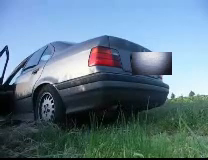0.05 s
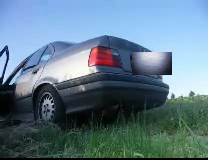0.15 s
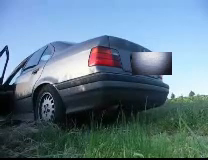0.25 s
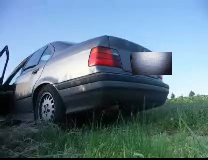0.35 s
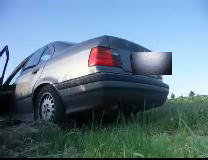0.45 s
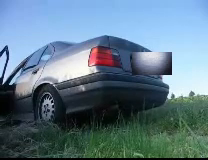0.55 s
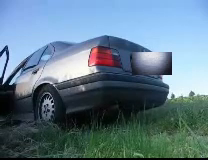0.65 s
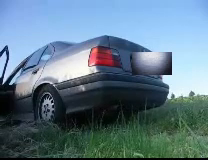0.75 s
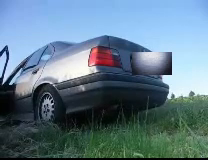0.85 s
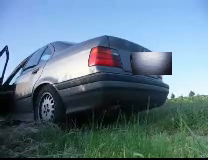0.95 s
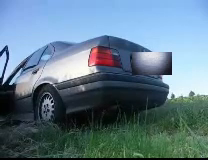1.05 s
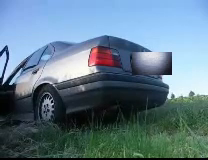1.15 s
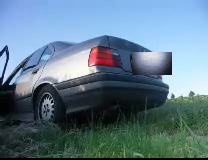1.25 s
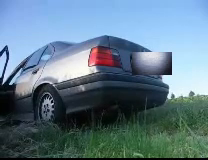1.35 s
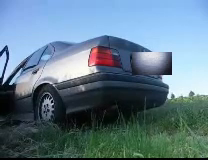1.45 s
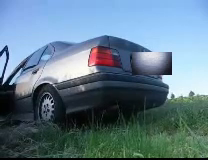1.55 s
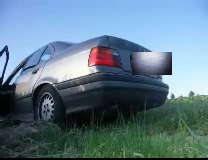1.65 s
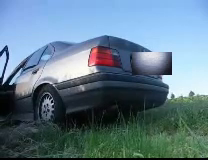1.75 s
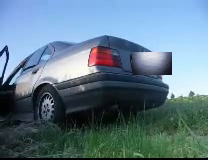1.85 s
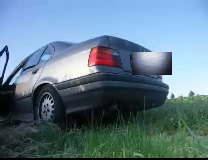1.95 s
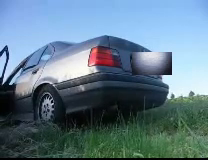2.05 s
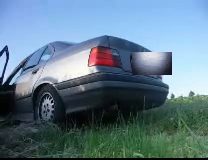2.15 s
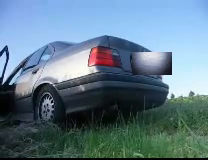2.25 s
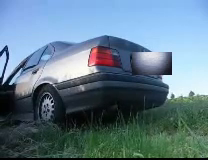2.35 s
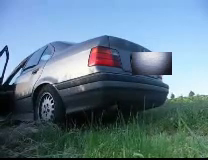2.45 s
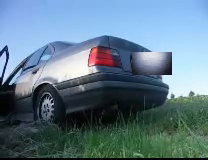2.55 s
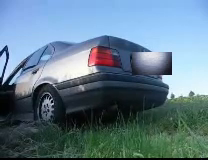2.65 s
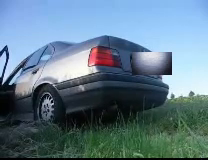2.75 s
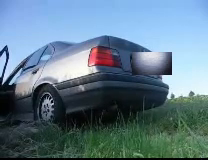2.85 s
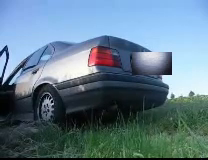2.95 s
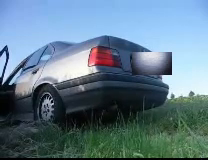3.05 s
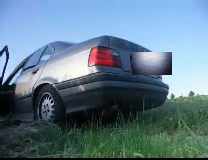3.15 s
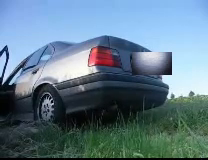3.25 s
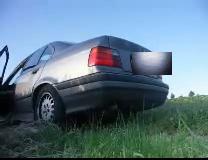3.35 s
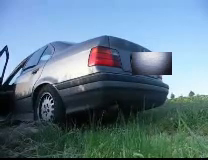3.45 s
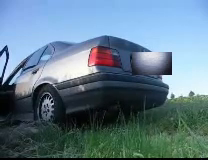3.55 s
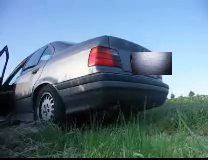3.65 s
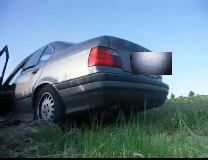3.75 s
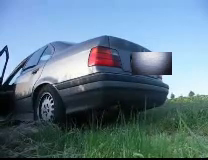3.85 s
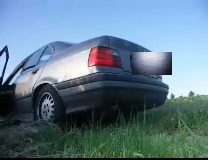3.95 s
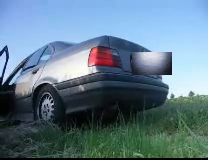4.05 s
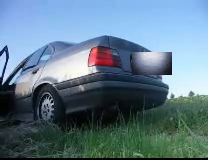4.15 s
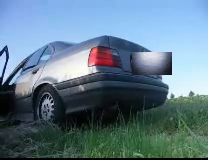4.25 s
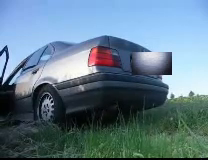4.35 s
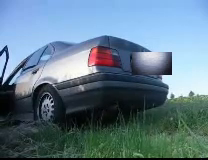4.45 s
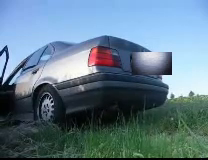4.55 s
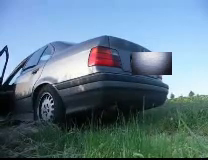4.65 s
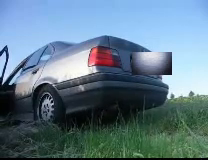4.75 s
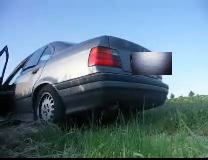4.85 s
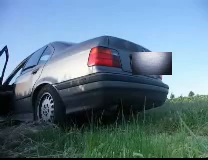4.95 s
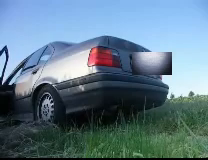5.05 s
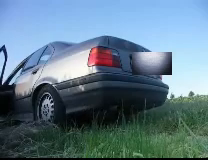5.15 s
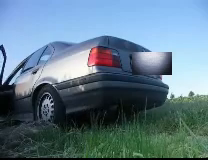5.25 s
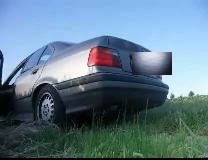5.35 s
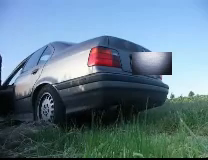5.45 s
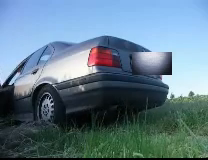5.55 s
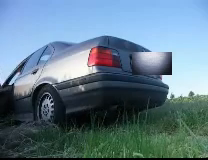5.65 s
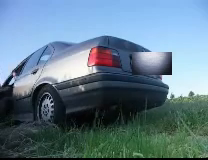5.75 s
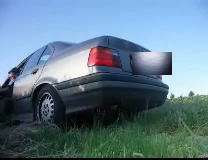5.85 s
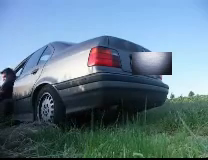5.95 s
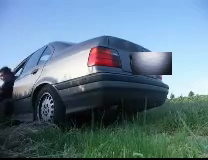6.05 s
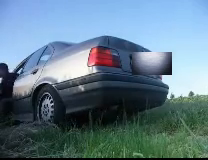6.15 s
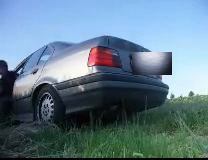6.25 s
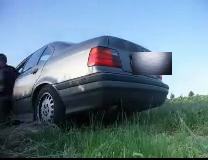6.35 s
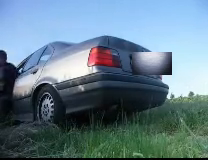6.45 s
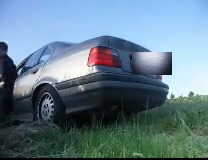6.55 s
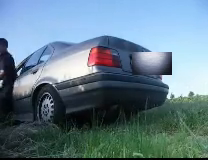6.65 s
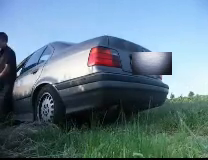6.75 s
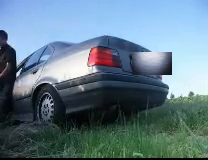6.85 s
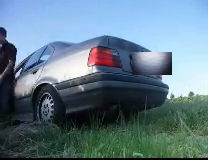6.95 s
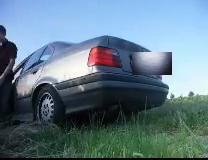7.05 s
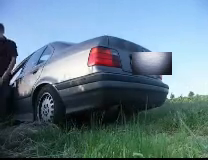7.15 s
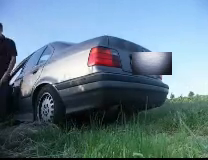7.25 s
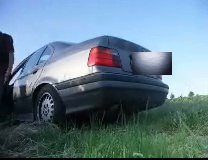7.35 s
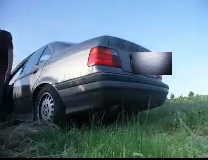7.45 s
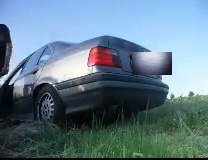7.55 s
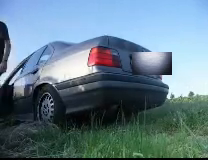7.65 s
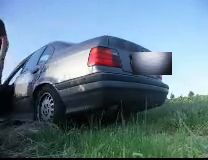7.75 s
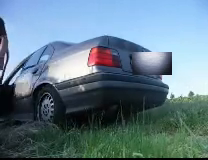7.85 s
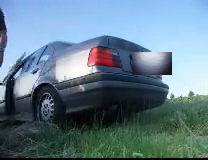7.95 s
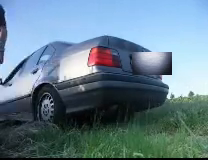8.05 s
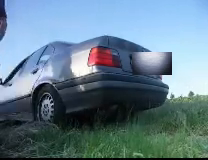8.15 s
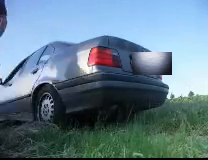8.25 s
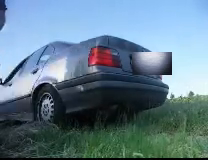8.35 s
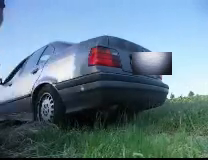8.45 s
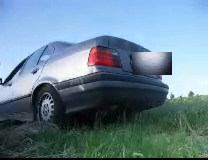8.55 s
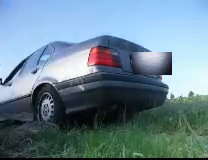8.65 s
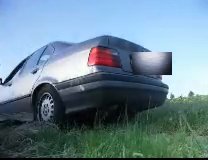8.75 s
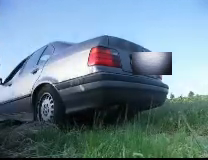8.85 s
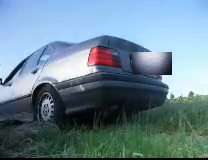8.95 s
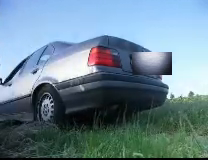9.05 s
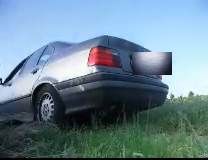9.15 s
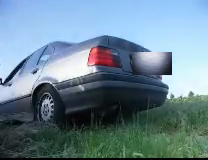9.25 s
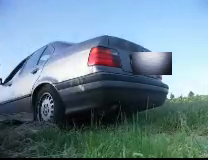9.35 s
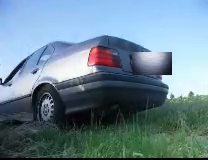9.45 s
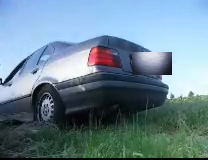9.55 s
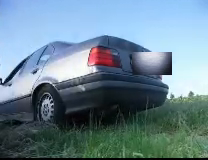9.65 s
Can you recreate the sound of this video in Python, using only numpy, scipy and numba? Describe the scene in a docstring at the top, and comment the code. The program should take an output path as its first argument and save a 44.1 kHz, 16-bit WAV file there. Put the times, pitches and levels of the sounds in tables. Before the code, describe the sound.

Outdoors, a small camera with muffled treble sits near a car's tailpipe. The engine is already revving, drops, gets two quick stabs, sags, then roars highest and crackles down to idle. Loose metal buzzes and rattles, the body knocks, and another engine hums and clatters steadily. Soft exhaust thumps follow, then a heavy door slam, quieter idling and dry grass crunching underfoot.

```python
"""A six-cylinder car roars as its throttle is stabbed, burbles and pops as the revs fall, then drops to idle.
Its firings ring the exhaust and a loose part buzzes and rattles; from the start a second engine whirrs nearby.
Knocks and bangs are short bursts through resonances. Late on, a door slams and steps crackle in the grass.
A small camera turns loud peaks down, lets the level creep back, and cuts the treble."""
import sys
import numpy as np
from scipy import signal
from scipy.fft import rfft, irfft, next_fast_len
from scipy.io import wavfile
from scipy.ndimage import uniform_filter1d
from numba import njit

SR = 44100
rng = np.random.default_rng(int(sys.argv[2]) if len(sys.argv) > 2 else 0)


def bounce(signal):
    """Save signal as a 16-bit WAV file at the path given by the first command-line argument."""
    frames = np.transpose(np.atleast_2d(signal))
    limited = np.clip(frames, -1, 1)
    pcm = np.round(limited * 32767).astype(np.int16)
    wavfile.write(sys.argv[1], SR, pcm)


N = 427769
T = np.arange(N) / SR  # time of every sample [s]


def undb(db):
    """Turn decibels into a gain."""
    return 10 ** (np.asarray(db) / 20)


def curves(rows):
    """Join each column of a table by straight lines in time."""
    s, *columns = np.transpose(rows)
    return [np.interp(T, s, column) for column in columns]


def cut(x, hz, kind, order=2):
    """Remove the lows, the highs or both with a Butterworth filter."""
    return signal.sosfilt(signal.butter(order, hz, kind, fs=SR, output="sos"), x + 1e-18)


def ring(x, modes):
    """Drive several resonances (frequency [Hz], width [Hz], level [dB]) with the same sound."""
    out = 0
    for hz, width, db in modes:
        b, a = signal.iirpeak(hz, hz / width, fs=SR)
        out = out + undb(db) * signal.lfilter(b, a, x + 1e-18)
    return out


def colour(x, points):
    """Shape the spectrum to pass through points (frequency [Hz], level [dB])."""
    hz, db = np.transpose(points)
    size = next_fast_len(len(x))
    f = np.fft.rfftfreq(size, 1 / SR)
    gain = undb(np.interp(np.log(f + 1), np.log(hz), db))
    return irfft(rfft(x, size) * gain, size)[:len(x)]


def steady(x, size=4000):
    """Even out the loudness over a moving stretch of samples, keeping the single beats."""
    power = uniform_filter1d(uniform_filter1d(x ** 2, size), size)
    return x / np.sqrt(np.abs(power) + 1e-14)


def add(out, s, x):
    """Mix a short sound in at a time in seconds."""
    i = int(s * SR)
    out[i:i + len(x)] += x[:max(N - i, 0)]


def gate(s, length, rise, fall):
    """Rise from 0 to 1, hold, and fall back; all times in seconds."""
    end = s + max(length, rise)
    return np.interp(T, [s, s + rise, end, end + fall], [0, 1, 1, 0])


def wander(hz):
    """Drift slowly at random around 0, with a spread near 1."""
    knots = np.arange(0, T[-1] + 1, .5 / hz)
    return 1.2 * np.interp(T, knots, rng.standard_normal(len(knots)))


def strikes(turn, angles, sizes):
    """Place an impulse each time the engine passes one of the angles (counted in firings)."""
    return np.bincount(np.searchsorted(turn, angles), sizes, N + 1)[:N]


def crackle(events, modes, grain_db):
    """Ring resonances with short swells (middle [s], peak [dB], length [s], brightness [Hz]) of tiny contacts."""
    out = np.zeros(N)
    for s, db, length, bright_hz in events:
        count = int(length * SR)
        grains = rng.standard_normal(count) * undb(grain_db * rng.exponential(size=count))
        swell = np.pad(grains * np.hanning(count), (0, 1500))  # room to ring on
        burst = cut(ring(swell, modes), bright_hz, "low")
        add(out, s - length / 2, undb(db) * burst / np.abs(burst).max())
    return out


# engine speed, with quick climbs and slow run-downs: (time [s], speed [firings per second])
ENGINE_SPEED = [(0, 67), (.17, 85), (.48, 69.8), (.7, 66.5), (.82, 60.2), (1.22, 49), (1.36, 60.7),
                (1.53, 69.2), (1.85, 59.7), (2.1, 65), (2.36, 58.6), (2.67, 62.6), (3.06, 57.4),
                (3.49, 47.7), (3.66, 50), (3.8, 78), (3.91, 109), (4.0, 123), (4.43, 109.5), (4.76, 99.2),
                (4.93, 92.4), (5.17, 79.5), (5.6, 53.5), (5.85, 39.4), (9.7, 38.9)]
IDLE_HZ = 38  # idling speed [firings per second]


def engine_motion():
    """Add up the speed into firings passed, and give the revs in octaves (doublings) above idle."""
    speed, = curves(ENGINE_SPEED)
    return .5 + np.cumsum(speed) / SR, np.log2(speed / IDLE_HZ)


# unevenness of the firings off the throttle: (time [s], unevenness [0-1])
BURBLE = [(.35, 0.4), (.65, 0.6), (3.05, 0.7), (3.4, 0.4), (4.25, 0.5), (4.6, 0.8), (4.9, 0.8), (5.15, 0.7),
          (5.6, 0.4), (6.3, 0.2), (8.3, 0.3), (9.3, 0.7)]
# surges of afterburn off the throttle: (time [s], length [s], gain [dB])
SURGES = [(0.31, 0.32, 3.5), (1.578, 0.13, 4.5), (1.943, 0.18, 5), (2.267, 0.49, 1.5), (4.464, 0.39, 4.5),
          (5.014, 0.53, 6)]
SURGE_RISE_S, SURGE_FALL_S = 0.059, 0.2
# stabs of the throttle, with the exhaust level at twice idle speed:
# (time [s], held for [s], exhaust level [dB], lull after it [s], change of level in the lull [dB])
THROTTLE_STABS = [(-.02, .165, -13.5, .15, -3), (1.218, .19, -12, .03, -2.5), (1.436, .114, -13, .1, -2.5),
                  (3.651, .37, -13.5, .29, -4)]
OPEN_S, CLOSE_S = 0.046, 0.015  # time the throttle takes to open and close
# throttle shut: level at idle and rise at twice that speed; the pipe's rise flattens, bark is relative to it
PIPE_DB, PIPE_RISE_DB, PIPE_BEND = -27.5, 11, 0.64
BARK_DB, BARK_RISE_DB = -17.5, 4
SHUT_DB = -2.5  # the idle sounds fainter once the door is shut
# throttle open: bark [dB] and unevenness [0-1] at twice idle speed
OPEN_BARK_DB, OPEN_BURBLE = -6.5, .1
# throttle open: changes per doubling of speed; unevenness only grows above twice idle speed
OPEN_RISE_DB, OPEN_BARK_RISE_DB, OPEN_BURBLE_RISE = 5.5, -6, .45


def effort(revs):
    """Let level, bark and unevenness follow the revs, and turn loud, hard and more even on the throttle."""
    pipe_db = PIPE_DB + PIPE_RISE_DB * np.maximum(revs, 0) ** PIPE_BEND
    pipe_db = pipe_db + SHUT_DB * (T > DOOR_BLOWS[0][0])
    bark_db = BARK_DB + BARK_RISE_DB * revs
    burble, = curves(BURBLE)
    for s, length, db in SURGES:
        pipe_db = pipe_db + db * gate(s, length, SURGE_RISE_S, SURGE_FALL_S)
    for s, held, db, lull, lull_db in THROTTLE_STABS:
        throttle = gate(s, held, OPEN_S, CLOSE_S)
        open_pipe_db = db + OPEN_RISE_DB * (revs - 1)
        open_bark_db = OPEN_BARK_DB + OPEN_BARK_RISE_DB * (revs - 1)
        open_burble = OPEN_BURBLE + OPEN_BURBLE_RISE * np.maximum(revs - 1, 0)
        # slide from the shut-throttle values to the open ones
        pipe_db = pipe_db + throttle * (open_pipe_db - pipe_db)
        pipe_db = pipe_db + lull_db * gate(s + held, lull, CLOSE_S, CLOSE_S)
        bark_db = bark_db + throttle * (open_bark_db - bark_db)
        burble = burble + throttle * (open_burble - burble)
    return pipe_db, bark_db, burble


# resonances that the clean harmonics slide through: (frequency [Hz], width [Hz], level [dB])
GROWL_MODES = [(203.4, 31, 8), (293, 49, -1), (418, 43, -11), (589, 20, -6.5)]
GROWL_TOP_HZ = 580


def growl(turn, odd_db, count=9):
    """Slide clean harmonics of the firing rate through the silencer's resonances; the highest fade away."""
    wave = 0
    for k in range(2, count + 1):
        level = undb(odd_db) if k % 2 else 1
        wave = wave - np.cos(2 * np.pi * k * turn) * level * (1 + .45 * wander(16))
    return steady(cut(ring(wave, GROWL_MODES), GROWL_TOP_HZ, "low", order=6), size=2500)


# strength of each cylinder in firing order [dB] when wholly uneven; under load they even out
CYLINDERS = [4, -6, 5, -4.5, 6, -11.5]
# exhaust resonances: (frequency [Hz], width [Hz], level [dB])
PIPE_MODES = [(132, 64, 1.5), (201, 20, 9.5), (264.7, 43, 3.5), (392, 47, -14), (456.6, 43, 1),
              (575, 45, -6.5), (750, 58, -8), (780, 140, -31.5)]
# firmness of the note: (time [s], share of power in clean harmonics [0-1], level of the odd ones [dB])
FIRMNESS = [(0, .02, 0), (.14, .02, 0), (.2, .5, -6), (.42, .55, -6), (.55, .55, 0), (.8, .25, 0),
            (1.18, .4, 0), (1.24, .02, 0), (1.55, .02, 0), (1.7, .5, 0), (2.2, .45, 0), (2.8, .3, 0),
            (3.5, .6, 0), (3.66, .02, 0), (3.82, .02, 0), (3.9, .7, -7), (4.02, .75, -6), (4.08, .25, -3),
            (4.3, .2, -3), (4.5, .75, -3), (4.8, .75, -4), (4.95, .45, -5), (5.08, .7, -10), (5.3, .7, -8),
            (5.42, .8, 2), (5.55, .7, 2), (5.7, .2, 0)]
# the exhaust's upper resonances against its lowest: (time [s], level [dB])
UPPER_LEVEL = [(0, -6), (.35, 0.5), (.55, -3.5), (.8, 0), (1.2, -5.5), (1.7, -2.5), (2.0, -4), (2.5, 2),
               (2.8, 5.5), (3.1, -2.5), (3.3, -9), (3.7, -5.5), (4.15, -1.5), (4.4, 0.5), (4.65, -2.5),
               (5.1, -0.5), (5.45, 4), (5.8, -8), (8.3, -6), (9.3, -4.5)]
# the silencer's boom: (time [s], level [dB])
BOOM_LEVEL = [(0, -22), (.2, -30.5), (.35, -24), (.5, -32), (1.1, -41.5), (1.5, -26), (2.1, -31.5),
              (2.8, -29), (3.2, -46), (3.65, -39.5), (3.8, -26), (4.0, -42), (4.3, -29), (4.9, -31.5),
              (5.1, -23.5), (5.45, -22), (5.8, -32), (8.3, -42), (9.7, -47.5)]


def exhaust(turn, revs, scatter_db=-4.0, jitter=0.05, gas=0.38, puff=1.0, afterburn=0.97, count=700):
    """Each firing sends a pressure spike and a puff of turbulent gas down the pipe; late burns fall between."""
    pipe_db, bark_db, burble = effort(revs)
    boom_db, = curves(BOOM_LEVEL)
    chance = rng.standard_normal((count, 3)).T
    k = np.arange(count)
    rough = np.interp(k, turn, burble)
    sizes = undb(rough * (np.resize(CYLINDERS, count) + scatter_db * np.clip(chance[0], -2, 2)))
    spikes = -strikes(turn, k + jitter * rough * chance[1], sizes)
    late_sizes = afterburn * rough * np.minimum(chance[2] ** 2, 2.6)
    late = -strikes(turn, k + rng.random(count), late_sizes)
    puffs = burble * np.sqrt(np.abs(burble)) * np.exp(-(turn % 1) / puff) * rng.standard_normal(N)
    flow = spikes + late + gas * puffs
    pipe = ring(flow, PIPE_MODES)
    # the mellow body and the hard bark swell separately with the throttle
    body = colour(pipe, [(60, -27), (125, -0.5), (420, 9.0), (620, -31.0), (1200, -53.0)])
    bark = colour(pipe, [(250, -30.5), (420, -13.0), (540, 6.0), (900, 3.0),
                         (1250, -31.5), (2000, -17.5), (4000, -16.0)])
    # the silencer's volume resonates as the firing rate passes through; its level follows a table
    boom = ring(spikes + 0.18 * (flow - spikes), [(59.3, 24, 0)])
    boom = ring(boom, [(83.0, 23, 0)])
    clean, odd_db = curves(FIRMNESS)
    note = np.sqrt(1 - clean) * steady(body) + np.sqrt(clean) * growl(turn, odd_db)
    upper = colour(note, [(215, -38), (265, -0.5)])
    note = steady(note + upper * (undb(curves(UPPER_LEVEL)[0]) - 1))
    return (note + steady(bark) * undb(bark_db)) * undb(pipe_db) + steady(boom) * undb(boom_db)


# the loose part's resonances: (frequency [Hz], width [Hz], level [dB])
LOOSE_PART_MODES = [(1740, 450, -10.5), (2920, 340, 3), (3420, 230, -4)]
BUZZ_DB, BUZZ_LAG, BUZZ_DECAY = -41.5, .35, 0.89  # lag and decay in firings


def buzz(turn):
    """On the throttle every firing shakes the loose part with a fading burst of noise."""
    throttle = sum(gate(s, held, OPEN_S, CLOSE_S) for s, held, *_ in THROTTLE_STABS)
    fading = np.exp(-((turn - BUZZ_LAG) % 1) / BUZZ_DECAY)
    shake = ring(rng.standard_normal(N) * fading, LOOSE_PART_MODES)
    return shake / shake.std() * throttle * undb(BUZZ_DB)


# the second engine, which sags and recovers: (time [s], speed [firings per second])
OTHER_SPEED = [(0, 77.1), (1, 76.1), (2.4, 75.2), (2.7, 74.3), (3, 72.1), (3.3, 70.8), (3.7, 70), (4.2, 71),
               (4.7, 72.5), (5.1, 74.1), (5.5, 76.4), (6, 77.25), (6.5, 77.35), (7, 76.8), (7.4, 75.6),
               (8.7, 75.3), (9, 73.1), (9.7, 71.8)]


def other_motion():
    """Add up the second engine's own speed into firings passed."""
    return np.cumsum(curves(OTHER_SPEED)[0]) / SR


# the second engine's tone colour: (frequency [Hz], level [dB])
BAY_COLOUR = [(240, -33), (400, 0.5), (466, -6.5), (498, -6), (586, -3.5), (729, -3.5), (1030, -3.5),
              (1840, -14), (2610, -13), (3450, -19), (3900, -33), (5070, -73), (8580, -120)]
# its ringing parts: (frequency [Hz], width [Hz], level [dB])
BAY_MODES = [(1053, 6, -2.5), (1301, 41, -3.5), (1656, 21, 1), (2535, 13, -3), (3360, 17, -12)]
# its clatter: (time [s], level [dB], extra treble [dB])
CLATTER_LEVEL = [(0, -41.5, 1), (.7, -30, 0), (1.24, -32, -2.5), (1.29, -38.5, -5), (1.5, -37.5, 2),
                 (2.3, -30, -3.5), (3.0, -32.5, -4), (3.64, -30.5, 1.5), (3.71, -38, -2), (4.0, -35.5, -4),
                 (4.3, -32.5, -0.5), (5.4, -33.5, -0.5), (6.3, -32, -3.5), (6.6, -31, -3), (7.1, -30, -3),
                 (7.5, -31.5, -2.5), (9.7, -35, -0.5)]


def clatter(turn, ringing=0.64, count=800, size=48):
    """The second engine ticks at the same angles on every firing, slowly changing, over the rush of its fan."""
    angles = np.arange(count)[:, None] + (np.arange(size) + rng.random(size)) / size
    drift = uniform_filter1d(rng.standard_normal((count, size)), 60, axis=0)
    signs = rng.choice([-1, 1], size)
    alternating = np.resize(rng.standard_normal((2, size)), (count, size))  # every other firing alike
    sizes = signs + .8 * drift / drift.std() + .35 * alternating
    ticks = cut(steady(strikes(turn, angles.ravel(), sizes.ravel())), 1250, "high", order=4)
    drive = ticks + .95 * rng.standard_normal(N)
    bay = colour(drive + ringing * ring(drive, BAY_MODES), BAY_COLOUR)
    bay = bay / np.std(cut(bay, 640, "high", order=4))
    db, treble_db = curves(CLATTER_LEVEL)
    treble = colour(bay, [(1300, -36.5), (2000, 0.5)])
    return (bay + treble * (undb(treble_db) - 1)) * undb(db)


def hum(turn, multiple):
    """Sound one slightly wavering multiple of an engine's firing rate."""
    drift = .25 * wander(5)
    return (1 + drift) * np.sin(2 * np.pi * multiple * turn + drift[::-1])


# low hum, relative to DRONE_DB: (multiple of firing rate, door open [dB], door shut [dB])
DRONE = [(1, -4.5, 4), (2, -10, -11), (4, -4, -19), (5, 3.5, -14.5), (6, -4.5, -15)]
DRONE_DB = -32
# whine: (multiple of firing rate, level relative to the clatter's [dB])
WHINE = [(7, -16), (8, -14), (9, -12), (11, -15), (12, -11), (13, -12), (14, -10), (15, -15), (16, -14),
         (17, -14), (18, -17)]


def drone(turn):
    """The second engine hums low, changing once the door is shut, and whines along with its clatter."""
    shut = T > DOOR_BLOWS[0][0]
    low = sum(np.where(shut, undb(shut_db), undb(open_db)) * hum(turn, multiple)
              for multiple, open_db, shut_db in DRONE)
    whine = sum(undb(db) * hum(turn, multiple) for multiple, db in WHINE)
    return low * undb(DRONE_DB) + whine * undb(curves(CLATTER_LEVEL)[0])


# rattles of the loose part: (time [s], peak level [dB])
RATTLES = [(0.183, -18), (.424, -18.5), (.455, -15.5), (.485, -18), (0.505, -11), (1.452, -21),
           (1.761, -20.5), (3.668, -14), (4.145, -13.5), (4.206, -18), (4.234, -22)]
RATTLE_S, RATTLE_HZ = 0.019, 3930  # length and brightness


def rattles():
    """The loose part chatters in short bursts of very uneven contacts."""
    return crackle([(s, db, RATTLE_S, RATTLE_HZ) for s, db in RATTLES], LOOSE_PART_MODES, grain_db=7.0)


# sharp knocks on the bodywork: (time [s], peak level [dB])
KNOCKS = [(.496, -18), (2.604, -12.5), (2.901, -15.5), (4.066, -19), (4.303, -18), (4.465, -15),
          (4.767, -2.5), (4.903, -10.5), (6.276, -17.5), (6.305, -18), (7.667, -21)]
KNOCK_S, KNOCK_HZ = .007, 3200  # length and brightness


def knocks():
    """Very short contacts ring the bodywork's broad resonances."""
    modes = [(1090, 490, 8), (2000, 1700, -3.0), (3000, 650, -8.5)]
    return crackle([(s, db, KNOCK_S, KNOCK_HZ) for s, db in KNOCKS], modes, grain_db=3.0)


# pops of unburnt fuel, each with the muttering that leads up to it:
# (time [s], peak level [dB], brightness [Hz], mutter length [s], mutter peak level [dB])
POPS = [(1.261, -6.5, 2000, 0.015, -13), (1.398, -4, 1770, 0.02, -14), (3.662, 0.5, 900, 0.06, -10.5),
        (3.68, -2, 2400, 0.018, -19), (3.936, -8.5, 1500, 0.017, -18), (4.14, 0, 1580, 0.061, -6.5),
        (4.196, -0.5, 900, .02, -26), (4.513, -8, 1200, 0.023, -16), (4.771, -13, 2600, 0.024, -1.5),
        (5.741, 13, 420, 0.083, -8.5), (6.274, 5.5, 390, 0.14, 0), (6.4, -4.5, 600, 0.08, -4),
        (6.466, -7.5, 503, 0.039, -17), (6.849, -2, 504, 0.083, -9), (7.284, -3.5, 350, 0.2, -13),
        (8.008, -4.5, 350, 0.16, -21), (8.867, -14, 199, 0.045, -16.5)]
MUTTER_HZ, MUTTER_LEAD = 350, 0.38  # brightness; share of its length by which its middle precedes the pop


def mutters():
    """Small uneven burns rumble in the exhaust's low resonances around each pop."""
    events = [(s - MUTTER_LEAD * length, db, length, MUTTER_HZ) for s, _, _, length, db in POPS]
    return crackle(events, [(149, 40, 2.5), (211, 90, 4.5), (300, 120, -5)], grain_db=-3.0)


def pops(count=4000):
    """A single bang, duller the deeper in the silencer it starts, rings briefly."""
    out = np.zeros(N)
    t = np.arange(count) / SR
    for s, db, bright_hz, _, _ in POPS:
        flame = 0.095 * rng.standard_normal(count) * np.exp(-t / 0.007) - (t == 0)
        bang = ring(flame, [(161, 96, 14.5), (231, 87, 11.0), (330, 43, -9.5), (700, 750, -45.0)])
        bang = cut(bang, bright_hz, "low")
        add(out, s - .001, undb(db) * bang / np.abs(bang).max())
    return out


# dull bumps in the deep bass: (time [s], peak level [dB])
BUMPS = [(1.366, -14), (4.765, -4.5)]


def bumps(hz=55, decay_s=0.0056, count=4000):
    """A heavily damped swing far down in the bass dies away almost at once."""
    out = np.zeros(N)
    t = np.arange(count) / SR
    for s, db in BUMPS:
        swing = np.sin(2 * np.pi * hz * t) * np.exp(-t / decay_s)
        add(out, s, -undb(db) * swing / swing.max())
    return out


# ringing of the door shell: (frequency [Hz], level [dB], time to fall by 60 dB [s])
DOOR_MODES = [(92, -10, 0.082), (172.5, -3, 0.25), (214, -3.5, 0.137), (384, -8, 0.094), (409, -0.5, 0.077),
              (514, -11, 0.041), (900, -7, 0.046), (1266, 0.5, 0.028), (1470, -19, 0.046)]
# blows of the closing door: (time [s], level [dB], extra latch level [dB])
DOOR_BLOWS = [(8.371, 2, 5), (8.376, 7, 4), (8.41, -4, -1), (8.452, -15, 0)]


def door(crack_db=-8.0, crack_t60=0.073, shell_db=-3, thud_db=-9, thud_t60=0.28, count=14000):
    """The latch cracks, the shell booms with a thud of cabin air, and the door settles against its seal."""
    out = np.zeros(N)
    t = np.arange(count) / SR
    for s, db, latch_db in DOOR_BLOWS:
        shell = sum(undb(g - 60 * t / t60) * np.sin(2 * np.pi * (hz * t + rng.random()))
                    for hz, g, t60 in DOOR_MODES)
        shell = undb(shell_db) * cut(shell, 110, "high")
        latch = ring(rng.standard_normal(count), [(900, 280, 15), (1320, 490, 27.0), (2420, 350, 18.3)])
        crack = latch / latch.std() * undb(crack_db + latch_db - 60 * t / crack_t60)
        air = cut(rng.standard_normal(count), [130, 750], "band")
        thud = air / air.std() * undb(thud_db - 60 * t / thud_t60)
        add(out, s, undb(db) * (shell + crack + thud))
    return out


# stalks brushing between the steps: span, rate, typical peak and spread either way, length, brightness
RUSTLE_START_S, RUSTLE_END_S, RUSTLE_PER_S = 9.05, 9.7, 46
RUSTLE_DB, RUSTLE_SPREAD_DB, RUSTLE_S, RUSTLE_HZ = -25.5, 5, 0.017, 3000


def rustle():
    """Stalks brush the legs at random moments, each a small swell."""
    count = int(RUSTLE_PER_S * (RUSTLE_END_S - RUSTLE_START_S))
    events = []
    for k, (when, size) in enumerate(rng.random((count, 2))):
        s = RUSTLE_START_S + (k + when) / RUSTLE_PER_S
        events.append((s, RUSTLE_DB + RUSTLE_SPREAD_DB * (2 * size - 1), RUSTLE_S, RUSTLE_HZ))
    return events


# grass crushed underfoot: (time [s], peak level [dB], length [s], brightness [Hz])
STEPS = [(9.087, -15, .016, 2500), (9.223, -20, 0.0077, 3000), (9.289, -17.5, 0.011, 1200),
         (9.326, -18, 0.024, 3000), (9.405, -12.5, .012, 1100), (9.428, -15, 0.017, 1200),
         (9.477, -9.5, .014, 1200), (9.486, -12.5, 0.012, 3200), (9.549, -16, 0.011, 3200),
         (9.577, -16, 0.0076, 1200), (9.586, -13.5, 0.014, 1200), (9.638, -14, 0.0084, 3500)]


def steps():
    """Crushed and brushed stalks crackle as many tiny contacts."""
    modes = [(750, 130, 5.0), (1030, 440, 6.0), (2050, 710, 2.0), (3000, 200, 3.0)]
    return crackle(list(STEPS) + rustle(), modes, grain_db=3.5)


def scene():
    """Speed and throttle drive the exhaust, the second engine keeps its own pace, small events lie on top."""
    turn, revs = engine_motion()
    other_turn = other_motion()
    engines = exhaust(turn, revs) + buzz(turn) + clatter(other_turn) + drone(other_turn)
    small_events = rattles() + knocks() + mutters() + pops() + bumps() + door() + steps()
    return (engines + small_events)[None]


@njit
def peak_follower(x, attack, release, ceiling):
    """Climb quickly with every peak above the ceiling and sink back slowly."""
    out, e = np.empty(len(x)), ceiling
    for i in range(len(x)):
        e = e + (x[i] - e) * attack if x[i] > e else max(e * release, ceiling)
        out[i] = e
    return out


# peak level [0-1] at which the gain starts to duck, and how fast it does
CEILING, ATTACK_S = 0.55, 0.0025
BAND_HZ, TOP_HZ = 3750, 8250  # treble cut before and after the last clipping
FULL_SCALE = .9  # peaks are clipped here before the first treble cut


def record(dry, recovery_db=24):
    """The camera ducks on loud peaks, recovers by some dB a second and cuts the treble; overloads splatter."""
    attack = 1 - np.exp(-1 / (ATTACK_S * SR))
    release = float(undb(-recovery_db / SR))
    peak = peak_follower(np.abs(dry[0]), attack, release, CEILING)
    ducked = np.clip(dry * CEILING / peak, -FULL_SCALE, FULL_SCALE)
    narrow = signal.sosfilt(signal.ellip(8, .3, 75, BAND_HZ, fs=SR, output="sos"), ducked)
    clipped = np.clip(narrow, -.94, .94)
    return signal.sosfilt(signal.ellip(8, .3, 75, TOP_HZ, fs=SR, output="sos"), clipped)


dry = scene()
out = record(dry)
bounce(out)
```